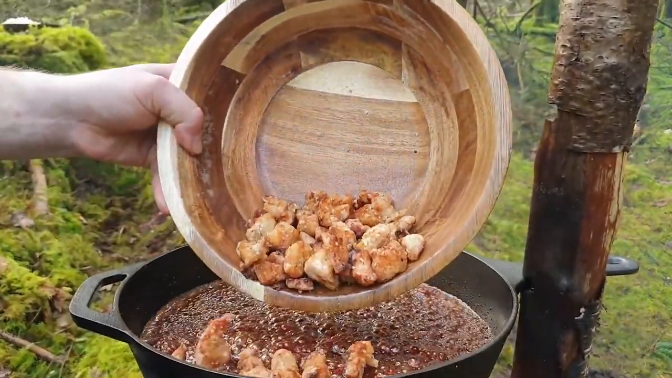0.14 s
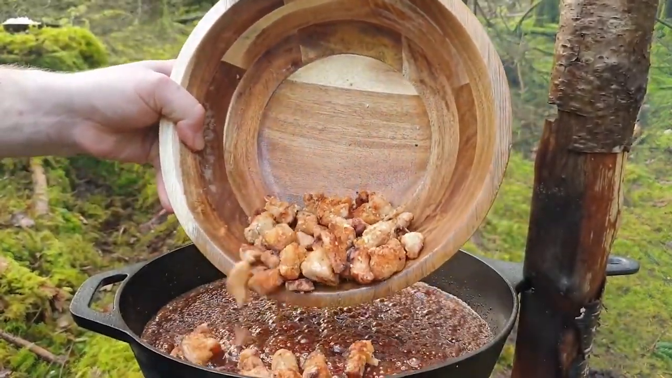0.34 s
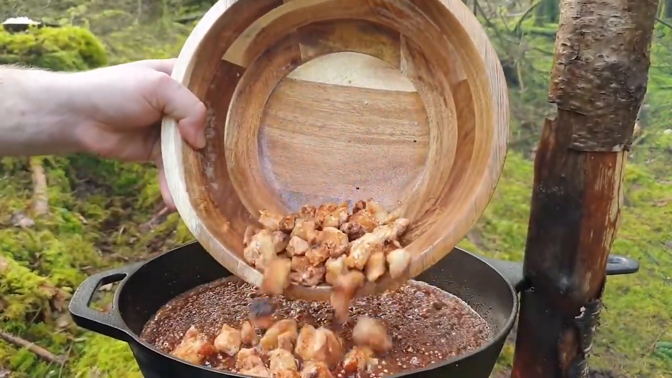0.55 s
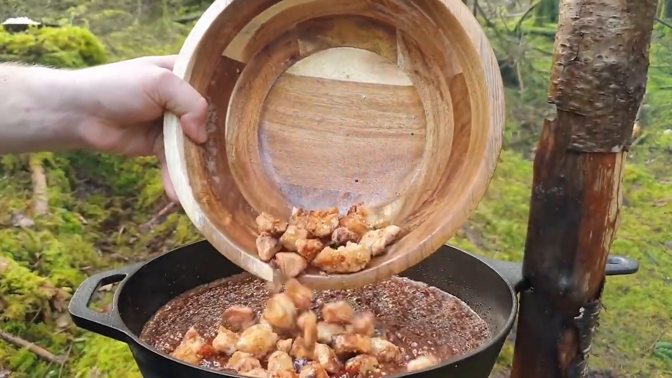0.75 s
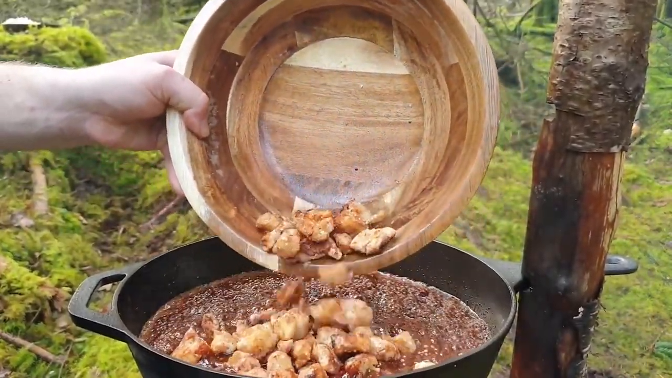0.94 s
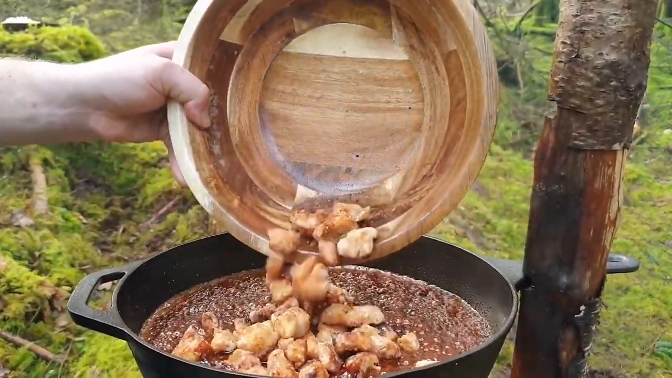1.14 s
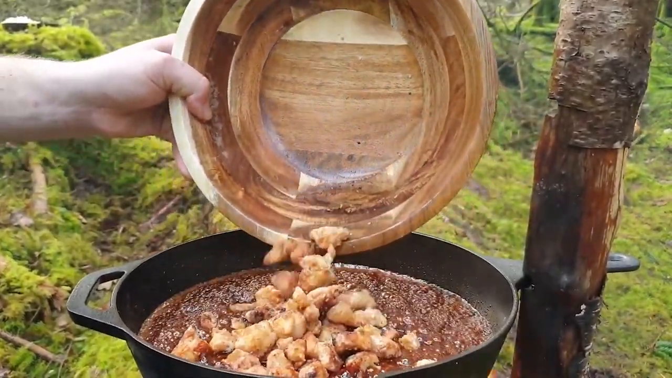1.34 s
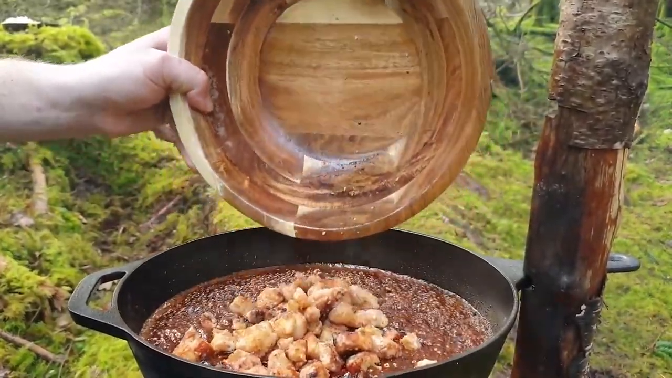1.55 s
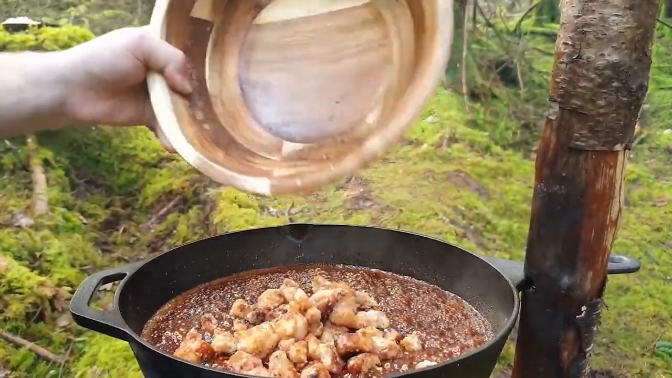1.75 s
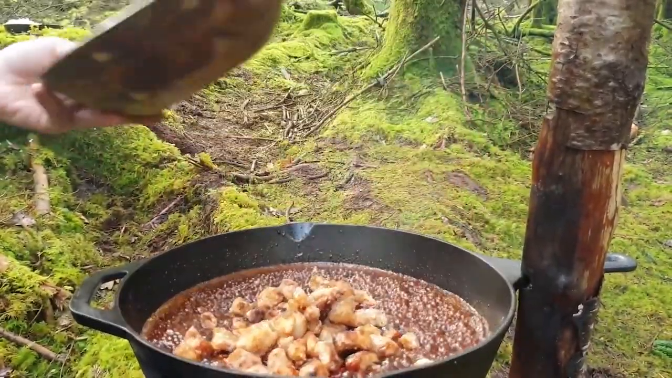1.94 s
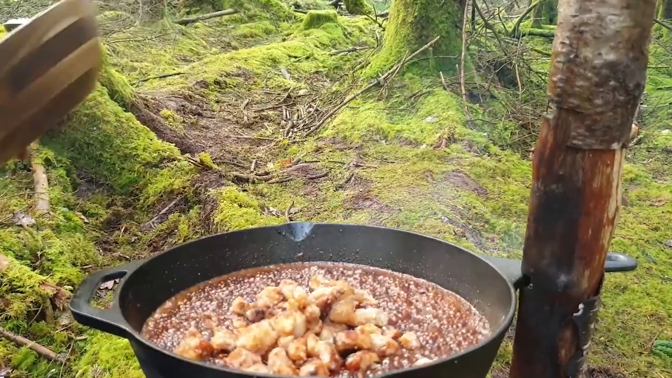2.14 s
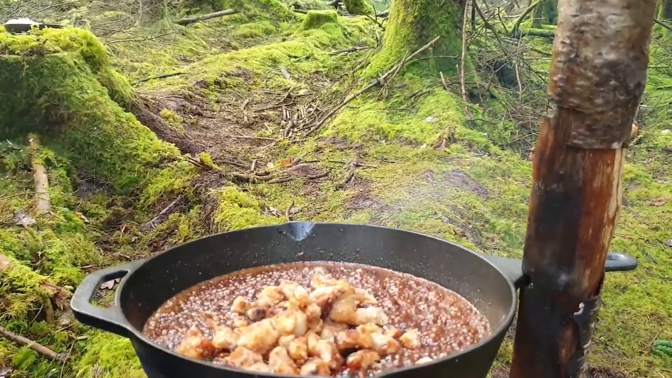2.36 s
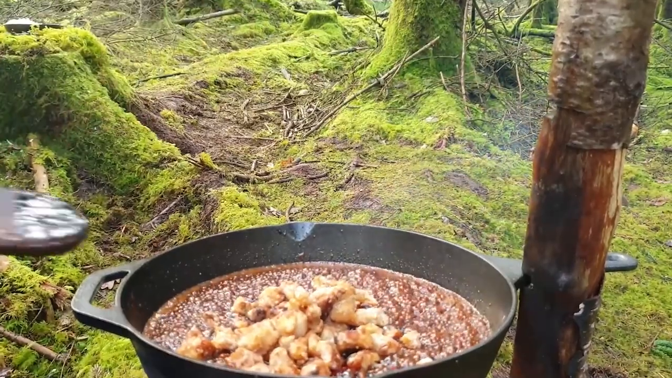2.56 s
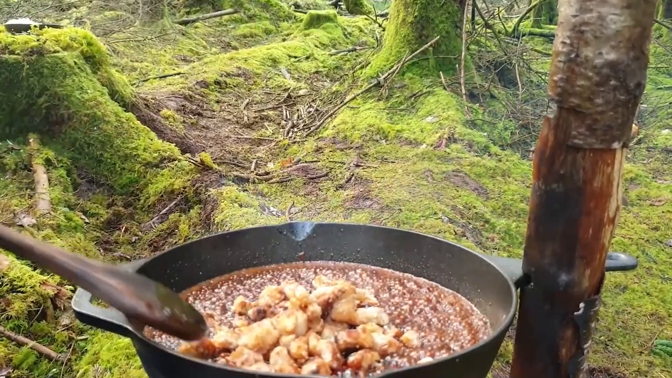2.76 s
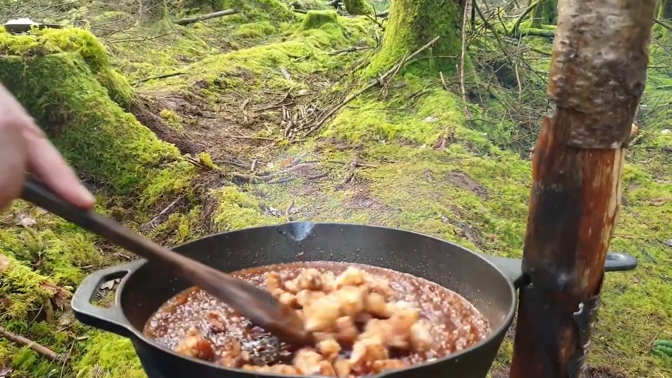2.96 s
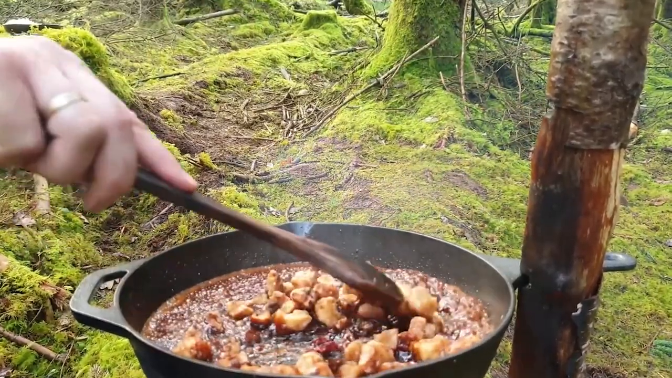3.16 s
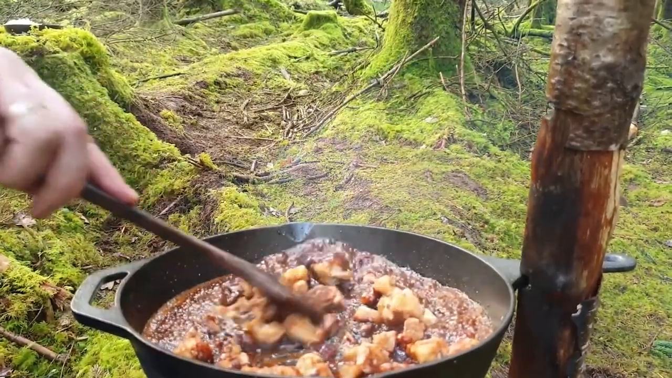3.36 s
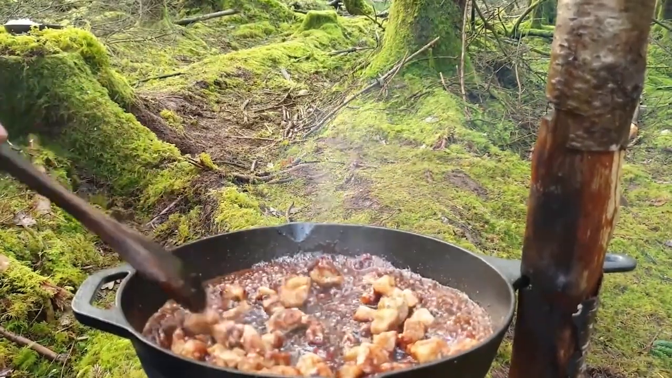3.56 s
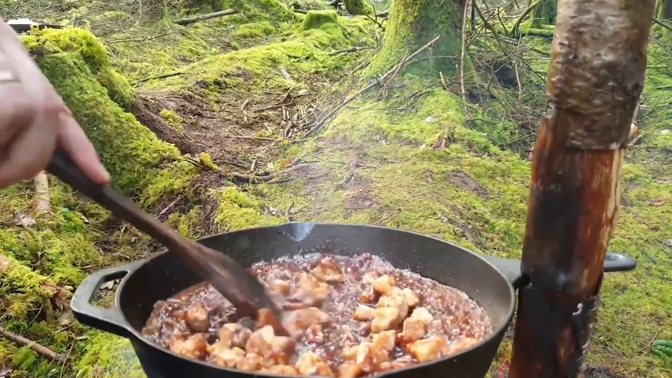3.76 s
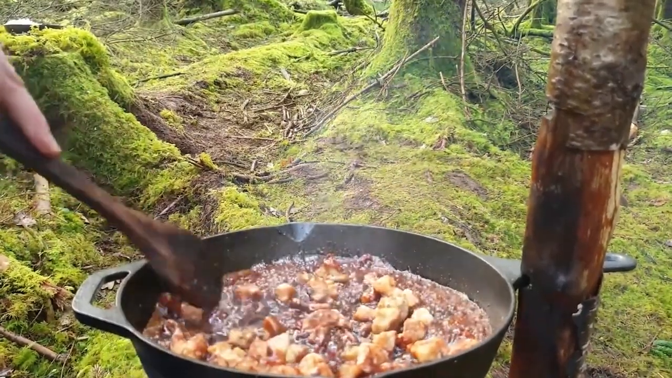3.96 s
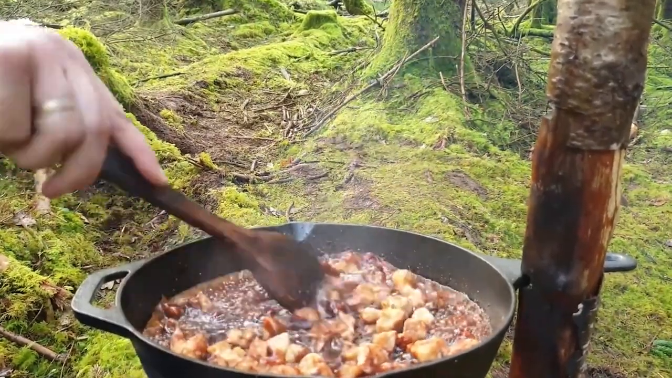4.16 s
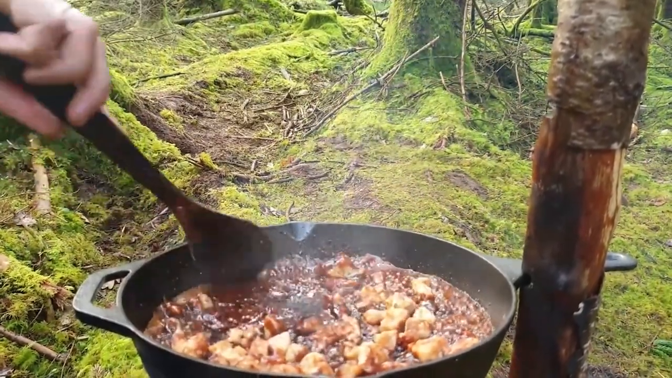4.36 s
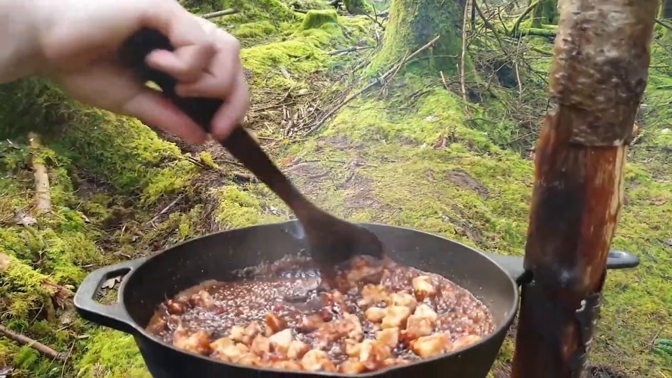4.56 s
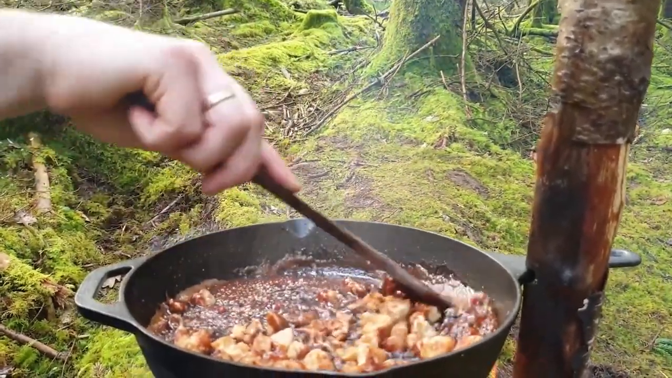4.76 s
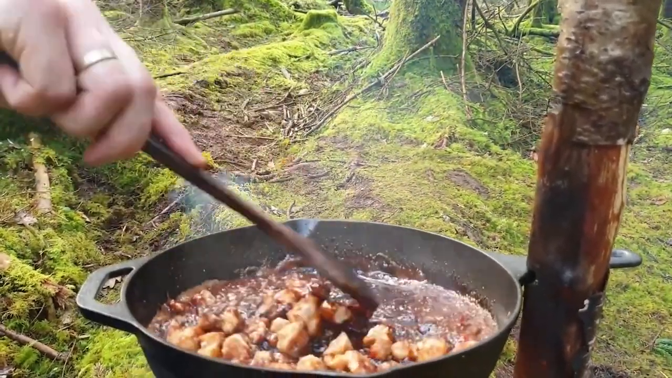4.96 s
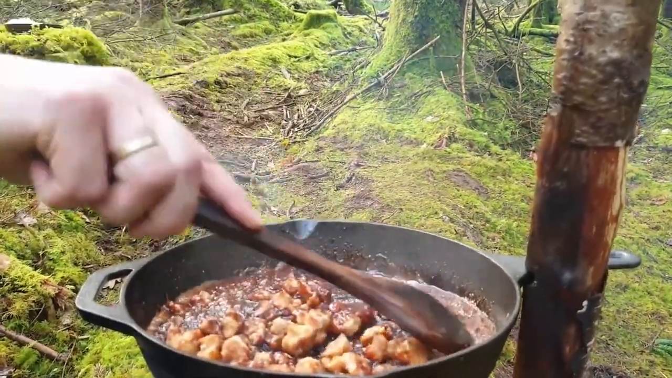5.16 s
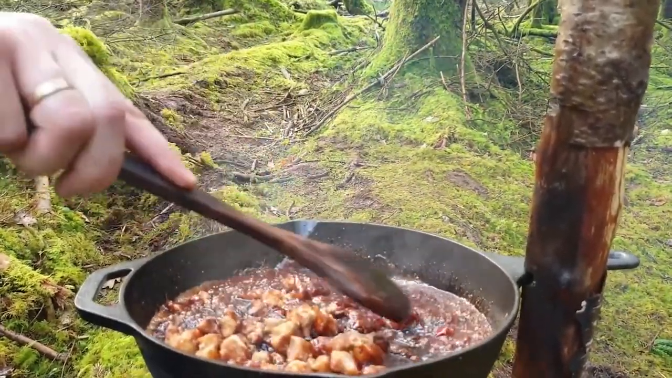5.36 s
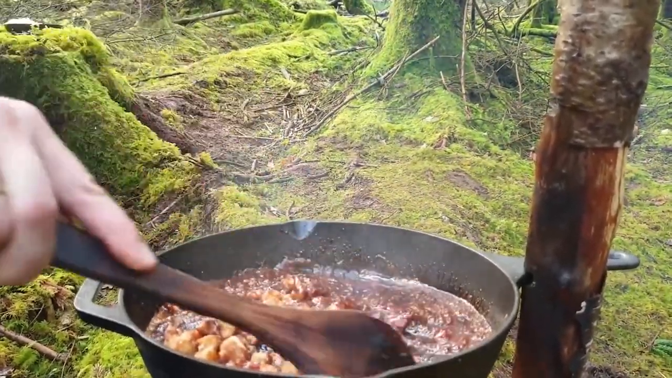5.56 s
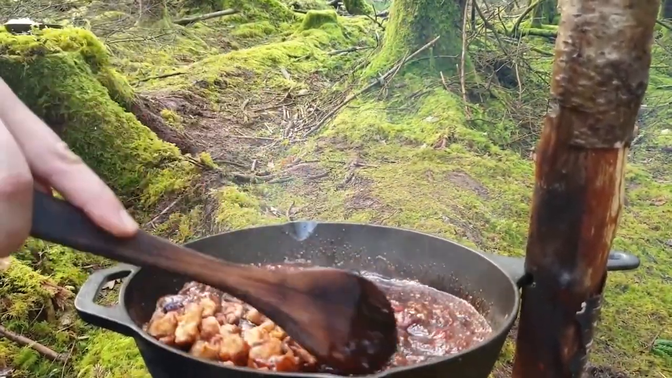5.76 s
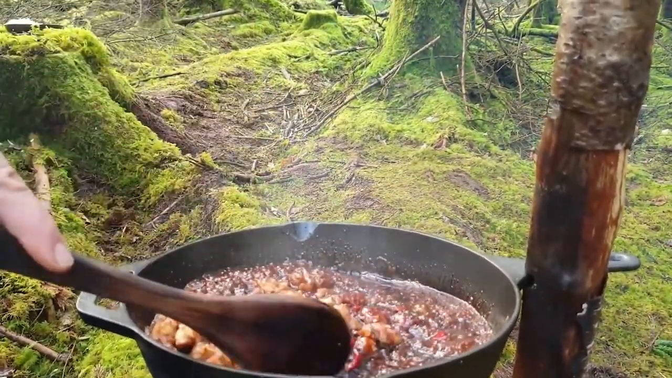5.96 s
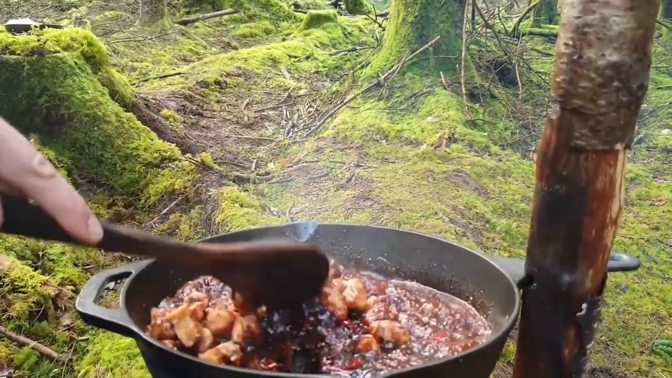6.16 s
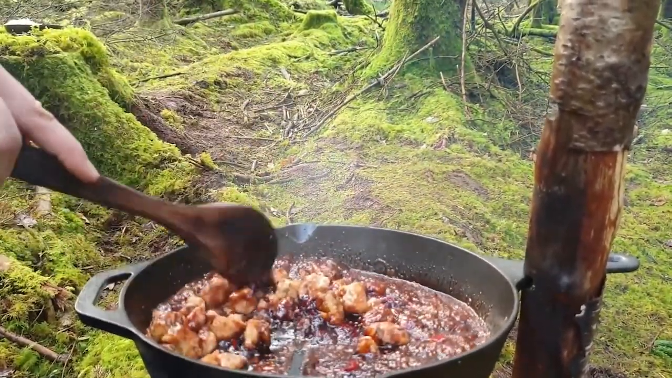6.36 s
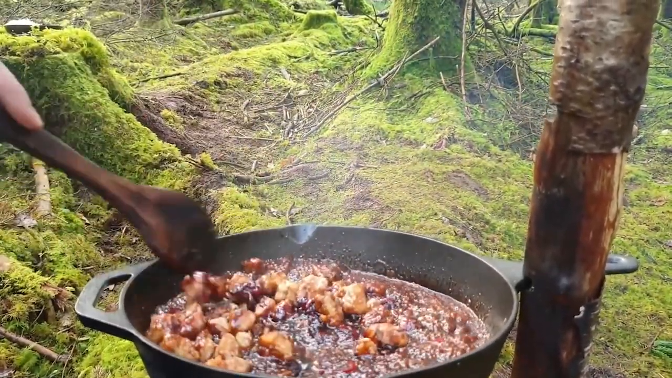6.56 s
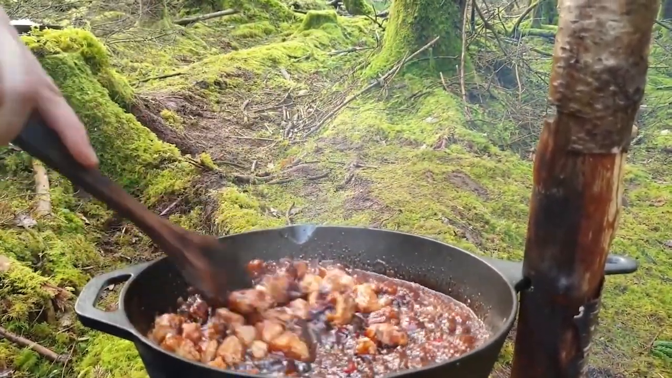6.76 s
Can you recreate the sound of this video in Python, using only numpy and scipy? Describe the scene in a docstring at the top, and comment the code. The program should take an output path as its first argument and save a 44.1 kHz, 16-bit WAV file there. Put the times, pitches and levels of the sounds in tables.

```python
"""Sauce simmers and sizzles in an iron pot over a fire: clicks are coloured, bubbles ring, the fire snaps.
First chicken pieces slide from a wooden bowl, which rattles on the rim, and plop in: resonated clicks, dull rings.
Then a wooden spoon stirs: swelling strokes squelch and scrape, knocks excite pot modes, the wall squeals.
Throughout, light air rumbles on the microphone as filtered noise, with short puffs.
Now and then a tiny bird calls far off: high gliding sines with an echo from the trees."""
import sys
import numpy as np
from scipy import signal
from scipy.fft import rfft, irfft
from scipy.io import wavfile
from scipy.ndimage import uniform_filter1d

SR = 44100
rng = np.random.default_rng(int(sys.argv[2]) if len(sys.argv) > 2 else 0)


def dump_mix(stems):
    """Bounce the given channels to the path in sys.argv[1] as a 16-bit WAV at rate SR."""
    frames = np.atleast_2d(stems).T  # one column per channel
    limited = np.clip(frames, -1, 1)  # hard clip at full scale
    pcm = np.round(limited * 32767).astype(np.int16)
    wavfile.write(sys.argv[1], SR, pcm)


N = 300321
TIME = np.arange(N) / SR
CUTOFF_HZ = 15750
PEAK_SAMPLES = 220  # window for the peak level of a blow, 5 ms


def from_db(db):
    """Decibels to gain."""
    return 10 ** (np.asarray(db) / 20)


def rms_one(x):
    """Scale to rms 1."""
    return x / np.sqrt(np.mean(x ** 2) + 1e-20)


def peak_level(x):
    """Highest short-time rms of each row."""
    return np.sqrt(uniform_filter1d(x ** 2, PEAK_SAMPLES).max(axis=-1, keepdims=True))


def dying(t, t60_s):
    """Exponential decay by 60 dB per t60."""
    return from_db(-60 * t / t60_s)


def gains(rows, fade_s=.3, silence_db=-100):
    """Level curves as gains per sample, fading to -100 dB outside their span."""
    s, *columns = np.transpose(rows)
    times = np.r_[s[0] - fade_s, s, s[-1] + fade_s]
    return [from_db(np.interp(TIME, times, np.r_[silence_db, c, silence_db])) for c in columns]


def add(out, s, sound):
    """Mix a sound in at a time."""
    start = max(round(s * SR), 0)
    out[..., start:start + sound.shape[-1]] += sound[..., :max(N - start, 0)]


def drift(knots_per_s):
    """Random curve of straight segments; rms 1."""
    knots = rng.standard_normal(int(N / SR * knots_per_s) + 2)
    return rms_one(np.interp(TIME * knots_per_s, np.arange(len(knots)), knots))


def grains(per_s, spread_db, clump_db):
    """Random clicks whose sizes vary singly and in clumps; row 0 is the direct sound, row 1 the scattered."""
    born = rng.random(N) < per_s / SR
    sizes = from_db(spread_db * np.minimum(rng.exponential(1, N), 4) + clump_db * drift(110))
    return rms_one(born * sizes * rng.choice([-1, 1], (2, N))) + 1e-18


def band(x, low_hz, high_hz, order=3):
    """Causal band-pass."""
    sos = signal.butter(order, [low_hz, high_hz], "band", fs=SR, output="sos")
    return signal.sosfilt(sos, x + 1e-18)


def colour(x, spectrum, size=8192):
    """Causal (minimum-phase) filter that follows (Hz, dB) points."""
    hz, db = np.transpose(spectrum)
    grid_hz = np.linspace(1, SR / 2, size // 2 + 1)
    cepstrum = irfft(np.log(from_db(np.interp(np.log(grid_hz), np.log(hz), db))))
    cepstrum[1:size // 2] *= 2
    cepstrum[size // 2 + 1:] = 0
    response = irfft(np.exp(rfft(cepstrum)))
    return signal.fftconvolve(x, response[None], axes=-1)[:, :N]


def resonate(x, peaks):
    """Parallel resonances of (Hz, width Hz, dB) with alternating signs; rms 1."""
    out = 0
    for k, (hz, width_hz, db) in enumerate(peaks):
        r = np.exp(-np.pi * width_hz / SR)
        poles = [1, -2 * r * np.cos(2 * np.pi * hz / SR), r * r]
        out = out + (-1) ** k * from_db(db) * (1 - r * r) * signal.lfilter([1, 0, -1], poles, x)
    return rms_one(out)


# Strokes of the spoon. Each row: start in seconds, swell in seconds, fade in seconds, push on the food in dB,
# scraping beside the push in dB, wetness beside the push in dB; layer gains come on top.
STROKES = [(2.957, 0.047, 0.6, -44.5, -0.5, -3), (3.14, 0.14, 0.21, -52, -4, -1.5),
           (3.312, 0.16, 0.34, -43, 2.5, -3.5), (3.721, 0.053, 0.34, -50, 2, -4),
           (3.838, 0.011, 0.37, -52.5, 5.5, 4), (4.079, 0.018, 1, -56.5, 1.5, -6.5),
           (4.22, 0.066, 0.17, -46.5, 0.5, -9.5), (4.52, 0.17, 0.47, -50.5, -1.5, -10),
           (4.75, 0.024, 1, -54, -2.5, -8.5), (4.931, 0.09, 0.19, -44.5, -1.5, -6),
           (5.251, 0.0053, 0.12, -51.5, 1, -2), (5.311, 0.067, 0.22, -47.5, 1.5, -7.5),
           (5.687, 0.12, 0.23, -47, 1, -9), (6.074, 0.035, 1, -48, -3, -10.5),
           (6.19, 0.13, 0.63, -52.5, -7, -9.5), (6.481, 0.085, 0.13, -55, 6.5, -1.5),
           (6.766, 0.029, 0.31, -42.5, 1.5, -16.5)]
SWELL_DB, FADE_DB = 7.5, 30  # climb to the peak of effort, fall after it
BITE_S, LET_GO_T60_S = 0.0012, 0.074
SCRAPE_POWER, WET_POWER = 1.46, 1.6  # growth with effort


def strokes():
    """The spoon bites, effort swells and fades, the spoon lets go; gains of push, scrape and squelch."""
    power, t = np.zeros((3, N)), TIME[:SR]
    for s, swell_s, fade_s, db, scrape_db, wet_db in STROKES:
        effort = from_db(np.interp(t, [0, swell_s, swell_s + fade_s], [-SWELL_DB, 0, -FADE_DB]))
        contact = np.minimum(t / BITE_S, 1) * dying(np.maximum(t - swell_s - fade_s, 0), LET_GO_T60_S)
        scrape = from_db(scrape_db) * effort ** SCRAPE_POWER
        wet = from_db(wet_db) * effort ** WET_POWER
        add(power, s, (from_db(db) * contact * np.array([effort, scrape, wet])) ** 2)
    return np.sqrt(power)


POP_DB = -4  # pops beside the smooth part of a wet sound
POP_SPREAD_DB, POP_CLUMP_DB = 3, 2


def pops(per_s, low_hz, high_hz, sharpness, count=16):
    """Separate bubbles and tearing films of sauce, each ringing briefly at one of a set of pitches; rms 1."""
    clicks = grains(per_s, POP_SPREAD_DB, POP_CLUMP_DB)
    dealt = rng.integers(0, count, N)
    out = 0
    for k, hz in enumerate(np.geomspace(low_hz, high_hz, count)):
        out = out + resonate(clicks * (dealt == k) + 1e-18, [(hz, hz / sharpness, 0)])
    return rms_one(out)


# Spectrum of tearing sauce. Each row: frequency in Hz, density in dB per Hz.
SQUELCH_COLOUR = [(150, -50), (400, 0.5), (2500, -13), (4500, -9), (7000, -11), (10000, -13.5),
                  (15500, -20)]


def squelch(spread_db, pops_per_s, low_hz, high_hz, sharpness):
    """Sauce tears and closes: dense coloured clicks under single pops."""
    smooth = rms_one(colour(grains(2200, spread_db, clump_db=2.5), SQUELCH_COLOUR))
    return smooth + from_db(POP_DB) * pops(pops_per_s, low_hz, high_hz, sharpness)


# Broad resonances of the filled pot, then of its wall. Each row: centre in Hz, width in Hz, level in dB.
POT_BODY = [(527, 154, 7.5), (700, 345, 2), (950, 290, 2.5), (1205, 210, -8)]
POT_WALL = [(1403, 163, 9), (1865, 64, 9), (2200, 344, 7), (3050, 260, -9.5)]
BUMPS_PER_S, BUMP_DB = 70, -11  # level beside the smooth churning


def bumps(bright_db=-9):
    """Sparse hits of chunks set the pot's hollow and wall ringing; rms 1."""
    hits = grains(BUMPS_PER_S, POP_SPREAD_DB, POP_CLUMP_DB)
    return rms_one(resonate(hits, POT_BODY) + from_db(bright_db) * resonate(hits, POT_WALL))


def slosh(centre_hz=580, swing_octaves=.2, width_hz=70):
    """The hollow behind the spoon opens and closes, and its low gurgle glides with it; rms 1."""
    pitch_hz = centre_hz * 2 ** (swing_octaves * drift(14))
    swells = np.array([drift(2 * width_hz), drift(2 * width_hz)])
    return rms_one(swells * np.sin(2 * np.pi * np.cumsum(pitch_hz) / SR))


def stirring(body_db=-1.5, wet_db=1, iron_db=-8, slosh_db=-7):
    """The spoon's edge catches and slips on the rough iron while the sauce tears and closes behind it."""
    catching = from_db(1.7 * drift(55))
    push, rub, wet = strokes() * catching
    slips = grains(per_s=900, spread_db=2, clump_db=0.5)
    body = band(resonate(slips, POT_BODY), 486, 1900, order=2)
    body = body + from_db(POP_DB) * pops(300, 355, 1515, sharpness=4.7) + from_db(BUMP_DB) * bumps()
    iron_peaks = [(hz, np.log(1000) / (np.pi * t60_s), db) for hz, db, t60_s in POT_MODES]
    wall = band(resonate(slips, POT_WALL), 890, 8700, order=2)
    scrape = wall + from_db(iron_db) * resonate(slips, iron_peaks)
    tearing = squelch(2, 800, 1930, 12400, sharpness=7.7)
    churn = from_db(body_db) * body + from_db(slosh_db) * slosh()
    return push * churn + rub * scrape + from_db(wet_db) * wet * tearing


# Pot and spoon ringing together. Each row: frequency in Hz, level in dB, t60 in seconds.
POT_MODES = [(738, -12.5, 0.05), (971, -5.5, 0.1), (1250, 0.5, 0.032), (1448, -5.5, 0.069),
             (1882, -8.5, 0.12), (2135, 6, 0.046), (2350, -5.5, 0.097), (2966, -9.5, 0.21),
             (3240, -16, 0.05), (3880, -6.5, 0.14), (4316, -1, 0.071)]


def pot_ring(t, hollow_hz, length, hollow_t60_s=0.073, hollow_db=4):
    """One blow rings the hollow above the food and the wall modes, at strengths varied by the point of contact."""
    out, quarter_turn = 0, np.array([[0], [np.pi / 2]])  # scattered sound is out of step with the direct
    for hz, db, t60_s in [(hollow_hz, hollow_db, hollow_t60_s)] + POT_MODES:
        strength = from_db(db + rng.normal(0, 2.6)) * np.array([[1], [rng.choice([-1, 1])]])
        out = out + strength * np.cos(2 * np.pi * hz * t + quarter_turn) * dying(t, t60_s * length)
    return out


# Edges of the four registers of a blow in Hz: boom, knock, clack, crack lie between them.
BAND_EDGES_HZ = [320, 750, 1650, 2650, 15500]


def weigh(sound, levels_db):
    """Give each register of a blow its own peak level."""
    out = 0
    for low_hz, high_hz, db in zip(BAND_EDGES_HZ, BAND_EDGES_HZ[1:], levels_db):
        part = band(sound, low_hz, high_hz)
        out = out + from_db(db) * part / peak_level(part)
    return out


# Wood hits the pot. Each row: start in seconds, boom in dB, knock in dB, clack in dB, crack in dB,
# treble edge in Hz (higher for a harder contact), ring length factor (held to 0.4-1.5), hollow pitch in Hz.
KNOCKS = [(0.009, -34, -35.5, -56, -46, 3020, 0.27, 514), (0.02, -49, -40.5, -39.5, -45, 9000, 1.35, 610),
          (1.711, -36.5, -33, -35, -42.5, 3020, 0.98, 558), (2.995, -49, -37.5, -35, -41.5, 8900, 1.2, 586),
          (3.449, -33, -29, -26, -24.5, 15000, 0.29, 554),
          (3.457, -32.5, -29.5, -33, -31.5, 9000, 0.83, 522),
          (3.767, -58, -42, -40, -37.5, 8800, 0.49, 570), (3.848, -47, -33, -37, -41.5, 9150, 0.56, 604),
          (3.867, -26, -26.5, -27.5, -46, 2450, 1.1, 517), (4.188, -36, -36.5, -56, -66, 1500, 0.5, 540),
          (4.231, -43.5, -33.5, -31, -41, 2960, 0.31, 570),
          (4.5128, -29.5, -27.5, -25, -42.5, 2130, 0.34, 745),
          (5.063, -41.5, -42, -42, -50, 5000, 0.77, 598),
          (5.6177, -34.5, -30.5, -32, -39.5, 2200, 0.66, 665), (5.634, -33, -32, -41, -41, 4000, 0.31, 424),
          (5.642, -41.5, -47, -31, -43, 3000, 0.6, 650), (5.658, -44, -41, -34.5, -45.5, 4020, 1.1, 560),
          (6.765, -28, -29, -34, -32.5, 4140, 0.59, 576)]


def knocks(crack_db=11, crack_t60_s=0.026, tail_db=-14, tail_t60_s=0.45):
    """Wood hits iron: a brief crack, the ring of the pot, then a faint scatter."""
    out, t = np.zeros((2, N)), TIME[:SR // 4]
    for s, *levels_db, edge_hz, length, hollow_hz in KNOCKS:
        length = np.clip(length, .4, 1.5)
        burst = from_db(crack_db) * dying(t, crack_t60_s) + from_db(tail_db) * dying(t, tail_t60_s * length)
        sound = burst * rng.standard_normal((2, len(t))) + pot_ring(t, hollow_hz, length)
        add(out, s, weigh(band(sound, BAND_EDGES_HZ[0], edge_hz, order=2), levels_db))
    return out


# The wall left ringing. Each row: start in seconds, frequency in Hz, level in dB, t60 in seconds.
RINGS = [(3.45, 3050, -22.5, 0.043), (4.515, 2220, -44, 0.26), (4.515, 1500, -38, 0.09),
         (5.866, 1865, -55, 0.22), (6.556, 1865, -47, 0.37), (6.767, 1865, -39.5, 1)]
# The whole pot jolted on its hook. Each row: start in seconds, level in dB.
JOLTS = [(5.615, -44.5), (6, -49), (6.765, -42.5)]
JOLT_HZ, JOLT_T60_S = 234, 0.082


def rings():
    """After a blow or as the spoon slips off, the wall sings on as a dying sine; a jolt makes the pot thump."""
    out, t = np.zeros((2, N)), TIME[:SR // 2]
    for s, hz, db, t60_s in RINGS:
        add(out, s, from_db(db) * np.sin(2 * np.pi * hz * t) * dying(t, t60_s))
    for s, db in JOLTS:
        add(out, s, from_db(db) * np.sin(2 * np.pi * JOLT_HZ * t) * dying(t, JOLT_T60_S))
    return out


# The spoon drags on the wall.
# Each row: start in seconds, length in seconds, start pitch in Hz, end pitch in Hz, level in dB.
SQUEALS = [(4.539, 0.14, 2160, 2460, -50), (4.637, 0.11, 2310, 2350, -49.5),
           (6.009, 0.095, 2200, 2280, -54.5), (6.482, 0.036, 2150, 2120, -64),
           (6.538, 0.026, 2134, 2200, -48.5)]
# Partials of a squeal. Each row: frequency ratio, level in dB.
SQUEAL_PARTIALS = [(1, 0), (1.4, -6), (1.84, -10), (2.35, -11)]
SQUEAL_SHRILL_DB = -45  # upper partials weaken below this level


def squeals(wander=.014, jitter=.032):
    """Wood sticks and slips on the wall: rough partials glide together, the upper ones weaker in soft squeals."""
    out = np.zeros((2, N))
    for s, length_s, start_hz, end_hz, db in SQUEALS:
        size = int(length_s * SR)
        waver = (1 + wander * drift(50) + jitter * drift(860))[:size]
        turns = np.cumsum(np.linspace(start_hz, end_hz, size) * waver) / SR
        shrill = from_db(min(db - SQUEAL_SHRILL_DB, 0))
        tone = 0
        for ratio, partial_db in SQUEAL_PARTIALS:
            strength = from_db(partial_db) * (shrill if ratio > 1 else 1)
            partial = np.sin(2 * np.pi * (ratio * turns + rng.random((2, 1))))
            tone = tone + strength * partial * drift(329)[:size]
        add(out, s, from_db(db) * signal.windows.tukey(size) * tone)
    return out


# A pocket behind the spoon fills with sauce.
# Each row: start in seconds, length in seconds, start pitch in Hz, end pitch in Hz, level in dB.
SLURPS = [(3.716, 0.08, 950, 1787, -40.5)]


def slurps(width_hz=420):
    """A narrow band of gurgle glides upward as the pocket shrinks."""
    out = np.zeros((2, N))
    for s, length_s, start_hz, end_hz, db in SLURPS:
        size = int(length_s * SR)
        tone = np.sin(2 * np.pi * np.cumsum(np.geomspace(start_hz, end_hz, size)) / SR)
        add(out, s, from_db(db) * signal.windows.tukey(size) * drift(2 * width_hz)[:size] * tone)
    return out


# Soft pieces landing in the sauce or tumbling off the spoon.
# Each row: start in seconds, level in dB before the mix gain, wetness as added treble tilt in dB per octave.
PLOPS = [(0.566, -36, -10), (0.617, -30, 0), (0.662, -37.5, 2), (0.709, -34.5, 0), (0.772, -28.5, -0.5),
         (0.842, -34.5, -1), (0.898, -37.5, 0.5), (0.98, -38, 1.5), (1.094, -34.5, 2), (1.112, -35, -1.5),
         (1.138, -40, -3), (1.209, -39, 0), (1.291, -36.5, 2.5), (1.317, -38.5, 1), (1.354, -35, -1),
         (1.386, -31, 1), (1.402, -35, 1), (1.465, -34, 1.5), (1.542, -40, 3), (1.626, -35, -1),
         (2.978, -35.5, -1.5), (3.203, -41.5, 0.5), (3.359, -41, 3.5), (3.376, -40.5, 4.5),
         (3.402, -32.5, 3), (3.71, -39, -20), (3.748, -40, 1.5), (4.083, -44.5, 2), (4.665, -43, 0.5),
         (4.964, -41.5, -0.5), (5.026, -51, 0), (5.254, -49.5, 3), (5.274, -33.5, -1.5), (5.695, -46.5, 3),
         (5.817, -45.5, -6), (6.001, -45, 1.5), (6.391, -40.5, -8), (6.525, -44, 2.5), (6.545, -39, -1.5)]
# Centres of boom, knock, clack and crack in Hz.
REGISTERS_HZ = [490, 1110, 2090, 4500]
PLOP_DB_PER_OCT = -3.5  # slope at zero wetness
WET_CLICKS_PER_S, CLICK_SPREAD_DB = 3000, 3


def plops(thud_db=13, hollow_hz=530, squash_t60_s=0.055, settle_db=-20, settle_t60_s=0.25, spatter_db=-12):
    """Each piece lands, squashes and settles: a dull pot ring at a varied hollow pitch under wet clicks."""
    out, t = np.zeros((2, N)), TIME[:SR // 4]
    octaves = np.log2(np.array(REGISTERS_HZ) / REGISTERS_HZ[0])
    squash = dying(t, squash_t60_s) + from_db(settle_db) * dying(t, settle_t60_s)
    for s, db, wetness in PLOPS:
        sizes = from_db(CLICK_SPREAD_DB * np.minimum(rng.exponential(1, len(t)), 4))
        clicks = sizes * (rng.random(len(t)) < WET_CLICKS_PER_S / SR)
        push = rms_one(clicks) * rng.standard_normal((2, len(t))) * squash
        ring = pot_ring(t, hollow_hz * rng.uniform(.9, 1.1), 1)
        thud = band(ring, BAND_EDGES_HZ[0], REGISTERS_HZ[1], order=2)
        sound = from_db(thud_db) * thud + resonate(push, POT_BODY) + from_db(spatter_db) * rms_one(push)
        add(out, s, weigh(sound, db + (PLOP_DB_PER_OCT + wetness) * octaves))
    return out


# Flow of meat out of the bowl. Each row: time in seconds, level in dB before the layer gains.
FLOW = [(0.3, -75.5), (0.524, -51.5), (0.662, -50), (0.778, -48), (1.054, -55), (1.43, -52), (1.584, -55),
        (1.72, -53.5)]
# Resonances of the bowl. Each row: centre in Hz, width in Hz, level in dB.
BOWL_WOOD = [(1350, 110, -18), (1774, 196, -11), (2000, 63, -5), (2365, 105, -17), (2640, 47, -12),
             (2930, 1200, -22)]
BOWL_EMPTY_S, SLIDE_STOP_T60_S = 1.48, 0.28  # sliding dies as the last piece leaves


def pouring(body_db=-3, slide_db=7, wet_db=-1):
    """Sticky meat slides down the wooden bowl and tumbles onto the heap."""
    flow, = gains(FLOW)
    in_bowl = dying(np.maximum(TIME - BOWL_EMPTY_S, 0), SLIDE_STOP_T60_S)
    slips = grains(per_s=900, spread_db=3.5, clump_db=1.5)
    tumble = band(resonate(slips, POT_BODY), 200, 2500, order=2)
    tumble = tumble + from_db(POP_DB) * pops(100, 357, 1240, sharpness=7.7) + from_db(BUMP_DB) * bumps()
    slide = band(resonate(slips, BOWL_WOOD), 1300, 5900, order=2)
    tearing = squelch(2.5, 370, 2260, 15600, sharpness=12)
    return flow * (from_db(body_db) * tumble + from_db(slide_db) * in_bowl * slide + from_db(wet_db) * tearing)


# The bowl taps the rim. Each row: start in seconds, level in dB before the mix gain.
BOWL_TAPS = [(0.81, -39.5), (1.073, -30.5), (1.103, -35)]


def bowl_taps(tap_t60_s=0.027):
    """A short rattle of wood on iron sets the bowl ringing."""
    out, t = np.zeros((2, N)), TIME[:SR // 6]
    for s, db in BOWL_TAPS:
        rattle = rng.standard_normal((2, len(t))) * dying(t, tap_t60_s)
        sound = band(resonate(rattle, BOWL_WOOD), 1530, 2570, order=2)
        add(out, s, from_db(db) * sound / peak_level(sound))
    return out


# Vigour of the sizzle, which flares when fresh meat meets the hot iron. Each row: time in seconds, level in dB.
SIZZLE = [(0, -51.5), (0.25, -79), (0.7, -55.5), (1.45, -59), (1.75, -68), (1.95, -63), (2.2, -69.5),
          (2.55, -65), (2.87, -71.5), (3.3, -60), (4.1, -65.5), (4.8, -65.5), (5.5, -69.5), (6.2, -67.5),
          (6.81, -69)]
# Spectra of the sizzle and of the simmer. Each row: frequency in Hz, density in dB per Hz.
SIZZLE_COLOUR = [(2500, -17), (4500, -21.5), (8000, -24), (10800, -10), (13000, -25), (15500, -21)]
SIMMER_COLOUR = [(120, 5), (230, -7), (340, -2), (480, -0.5), (800, -3), (1150, -13), (1500, -19),
                 (3500, -22.5), (8000, -20.5)]


def simmering(simmer_db=-61):
    """Thick bubbles murmur in the sauce; countless small ones burst on the hot wall in uneven flurries."""
    flurries = from_db(2.1 * drift(45))
    fizz = pops(600, 7500, 15000, sharpness=5)
    sizzle = rms_one(colour(grains(per_s=2500, spread_db=2, clump_db=1), SIZZLE_COLOUR))
    sizzle = sizzle + from_db(POP_DB) * fizz
    blips = from_db(-9) * pops(160, 480, 1150, sharpness=10, count=8)
    murmur = rms_one(colour(grains(per_s=2000, spread_db=2, clump_db=1.15), SIMMER_COLOUR)) + blips
    return gains(SIZZLE)[0] * flurries * sizzle + from_db(simmer_db) * murmur


def spitting(spit_db=-7, spit_t60_s=.012):
    """Drops of fat spit with short crackles, louder as the sizzle flares."""
    drops = np.abs(grains(per_s=22, spread_db=3, clump_db=1)[0])
    envelope = signal.fftconvolve(drops, dying(TIME[:SR // 50], spit_t60_s))[:N]
    crackle = rms_one(band(envelope * rng.standard_normal((2, N)), 6000, 15000, order=1))
    return from_db(spit_db) * gains(SIZZLE)[0] * crackle


# Loudest snaps of fire and hot fat. Each row: start in seconds, level in dB before the mix gain, centre in Hz.
SNAPS = [(0.4758, -39.5, 10000), (0.7907, -37.5, 14000), (0.9064, -38, 12000), (0.9853, -42, 10400),
         (1.3504, -41, 11700), (1.484, -42, 8000), (1.529, -41, 11000), (1.6512, -38, 10500),
         (2.0207, -41, 8500), (2.037, -45, 9000), (2.0451, -43, 11100), (2.0648, -42.5, 10100),
         (2.289, -50.5, 11300), (3.3252, -40.5, 7900), (3.397, -36, 8750), (3.9692, -38, 6800),
         (4.805, -51, 9500), (5.0648, -23.5, 9850), (5.164, -39, 10700), (6.566, -40.5, 10200)]


def snaps(snap_t60_s=0.0069, echo_db=-30, echo_t60_s=0.059, width_hz=5000, broad_db=-7):
    """Tiny bright bursts with a trace of scatter from the pot and the ground."""
    out, t = np.zeros((2, N)), TIME[:SR // 25]
    decay = dying(t, snap_t60_s) + from_db(echo_db) * dying(t, echo_t60_s)
    for s, db, hz in SNAPS:
        burst = rng.standard_normal((2, len(t))) * decay
        peak = [(hz, width_hz, 0)]
        broad = rms_one(band(burst, *BAND_EDGES_HZ[-2:], order=1))
        sound = resonate(resonate(burst, peak), peak) + from_db(broad_db) * broad
        add(out, s, from_db(db) * rms_one(sound) * np.sqrt(PEAK_SAMPLES / len(t)))
    return out


# Puffs of air. Each row: peak time in seconds, length in seconds, level in dB.
PUFFS = [(0.6, 0.33, -52.5), (1.555, 0.29, -56), (1.84, 0.07, -54), (2.025, 0.081, -47),
         (2.571, 0.12, -54.5), (4.198, 0.2, -54.5), (4.918, 0.24, -50), (5.499, 0.07, -52)]
# Spectrum of the air. Each row: frequency in Hz, density in dB per Hz.
BREEZE_COLOUR = [(15, -7.5), (35, -21), (60, 8.5), (100, -4), (190, -8.5), (400, -24.5), (1500, -102)]


def breeze(steady_db=-65):
    """Light air rumbles on the microphone and swells in short puffs."""
    pressure = np.full(N, from_db(steady_db))
    for s, length_s, db in PUFFS:
        add(pressure, s - length_s / 2, from_db(db) * np.hanning(int(length_s * SR)))
    return pressure * rms_one(colour(rng.standard_normal((2, N)), BREEZE_COLOUR))


# Thin falling notes.
# Each row: start in seconds, length in seconds, start pitch in Hz, end pitch in Hz, level in dB.
BIRD = [(0.268, 0.087, 7960, 7320, -64.5), (2.934, 0.045, 7950, 7650, -61),
        (3.763, 0.12, 7970, 7180, -56.5), (3.952, 0.13, 7840, 7220, -53.5), (4.195, 0.025, 8150, 8100, -65),
        (6.584, 0.023, 8100, 7770, -55)]


def bird(trill_hz=34, swing_hz=260, waver_hz=130, forest_t60_s=0.3, direct_db=-1):
    """Very high warbled sines, heard direct and as a diffuse echo from the trees."""
    out, echo_t = np.zeros((2, N)), TIME[:SR // 3]
    for s, length_s, start_hz, end_hz, db in BIRD:
        t = TIME[:int(length_s * SR)]
        trill = swing_hz * np.sin(2 * np.pi * (trill_hz * t + rng.random()))
        pitch_hz = np.linspace(start_hz, end_hz, len(t)) + trill + waver_hz * drift(235)[:len(t)]
        swell = np.sin(np.pi * t / length_s)
        add(out, s, from_db(db) * swell * np.sin(2 * np.pi * np.cumsum(pitch_hz) / SR))
    trees = rms_one(rng.standard_normal((2, len(echo_t))) * dying(echo_t, forest_t60_s))
    echo = signal.fftconvolve(out, trees / np.sqrt(len(echo_t)), axes=-1)[:, :N]
    return from_db(direct_db) * out + echo


# Balance of the sides. Each row: frequency in Hz, left over right in dB.
LEAN = [(30, 2.9), (150, 3), (400, 8.1), (700, 6.5), (1300, 9.3), (2400, 2.7), (4400, 8.8), (8000, 8.5),
        (15000, 11.2)]
# Likeness of the sides. Each row: frequency in Hz, likeness from 0 to 1 (held below 0.99).
LIKENESS = [(40, 0.24), (200, 1), (640, 0.86), (1400, 0.14), (2200, 0.33), (3500, 0.24), (7000, 0.077),
            (15000, 0.63)]


def two_ports(x, lag_s=.00007):
    """Sound reaches the left port first and louder; the scattered part enters with opposite signs."""
    hz, alike = np.transpose(LIKENESS)
    alike = np.clip(alike, -.99, .99)
    direct = colour(x[:1], np.c_[hz, 10 * np.log10((1 + alike) / 2)])
    scattered = colour(x[1:], np.c_[hz, 10 * np.log10((1 - alike) / 2)])
    hz, lean_db = np.transpose(LEAN)
    left = colour(direct + scattered, np.c_[hz, lean_db / 2])[0]
    right = colour(direct - scattered, np.c_[hz, -lean_db / 2])[0]
    return np.array([left, np.interp(TIME - lag_s, TIME, right)])


def scene(plop_db=-3, tap_db=4, snap_db=-3):
    """Everything is heard a little to the left."""
    spoon = stirring() + knocks() + rings() + squeals() + slurps()
    meat = pouring() + from_db(plop_db) * plops() + from_db(tap_db) * bowl_taps()
    heat = simmering() + spitting() + from_db(snap_db) * snaps()
    return two_ports(spoon + meat + heat + breeze() + bird())


def record(dry):
    """A steep elliptic low-pass cuts the top."""
    return signal.sosfilt(signal.ellip(10, .2, 80, CUTOFF_HZ, fs=SR, output="sos"), dry)


dry = scene()
out = record(dry)
dump_mix(out)
```